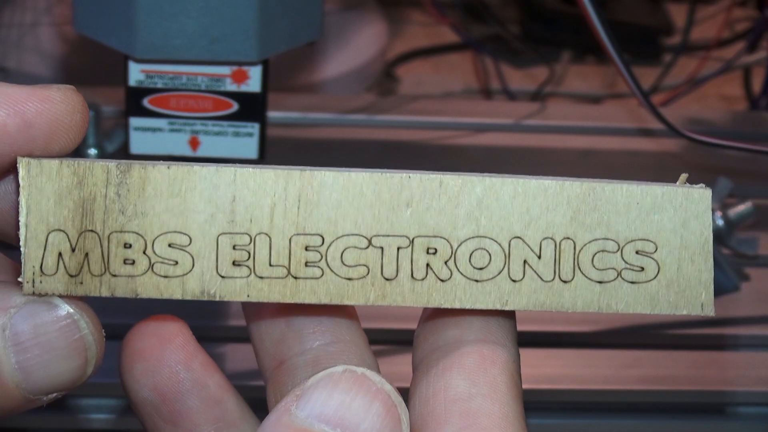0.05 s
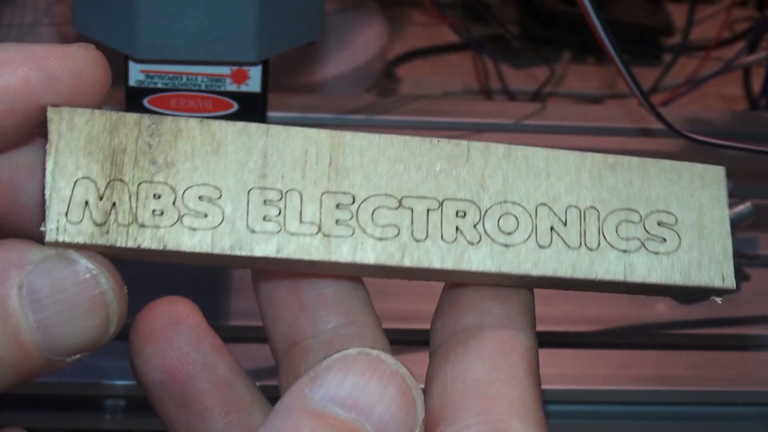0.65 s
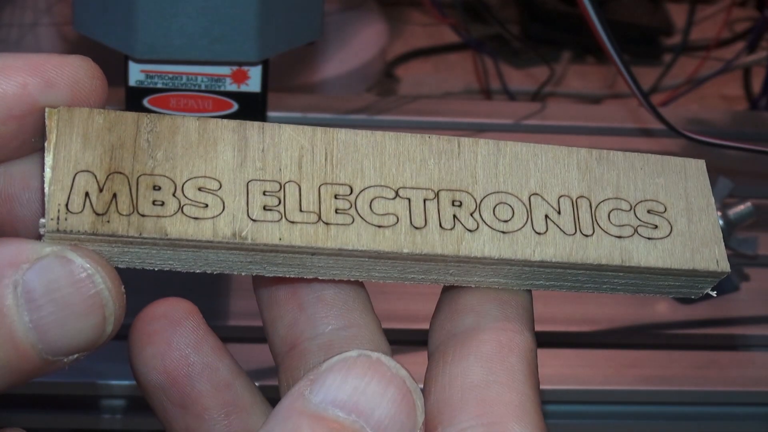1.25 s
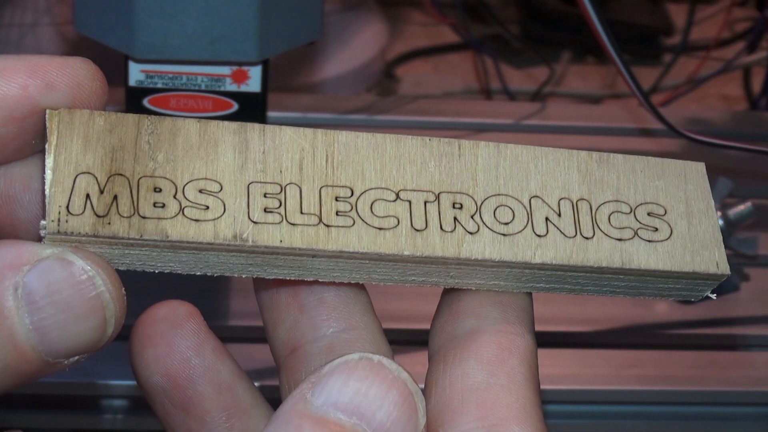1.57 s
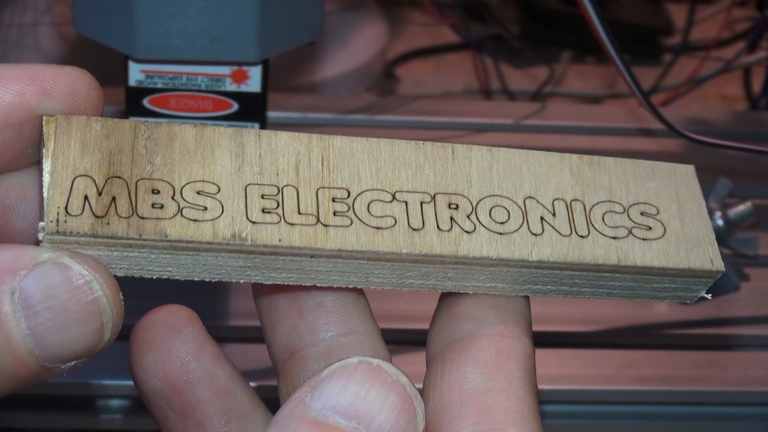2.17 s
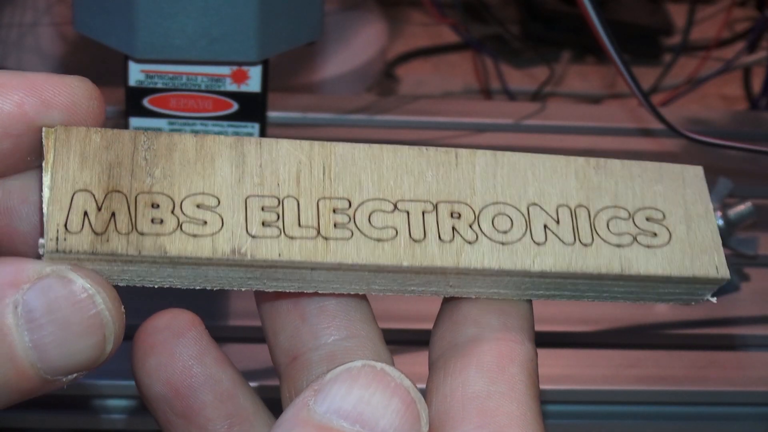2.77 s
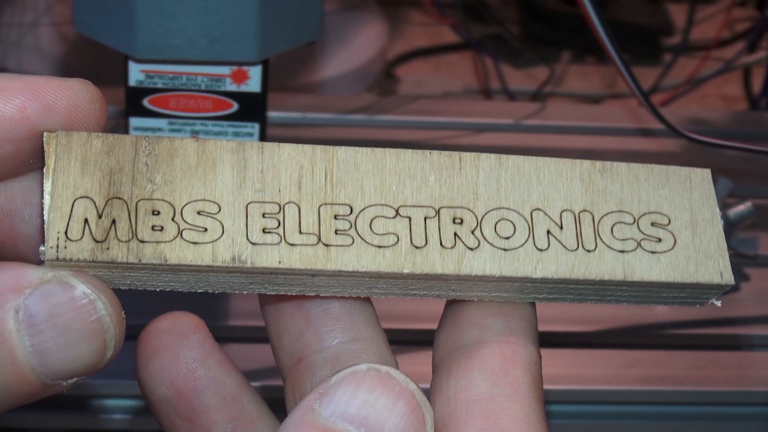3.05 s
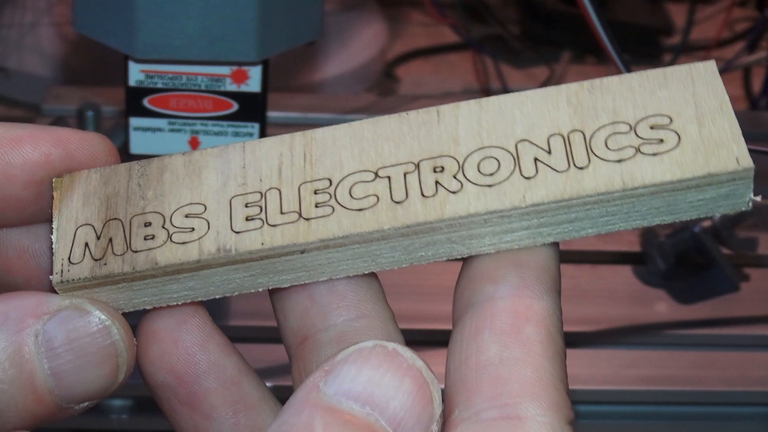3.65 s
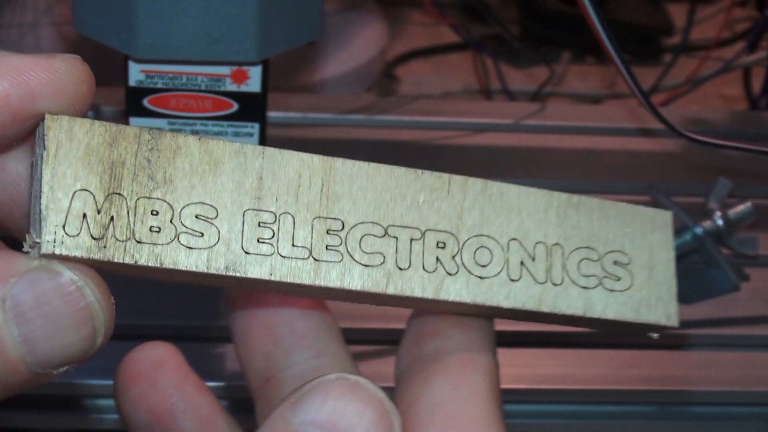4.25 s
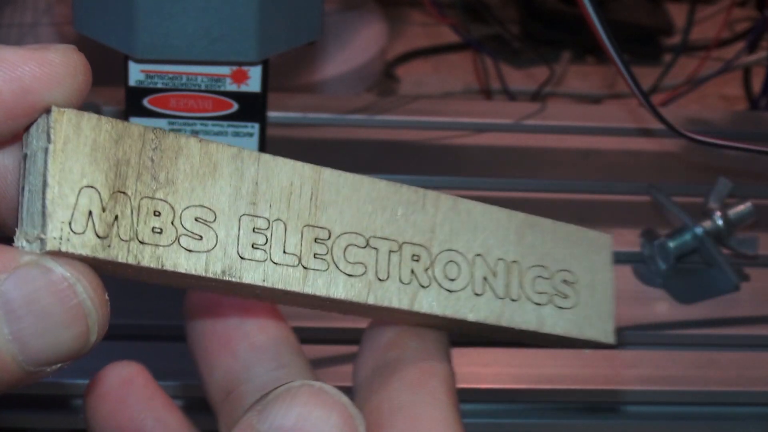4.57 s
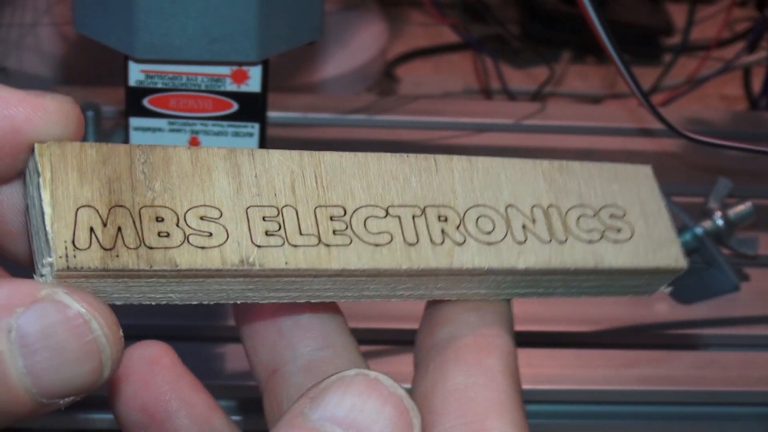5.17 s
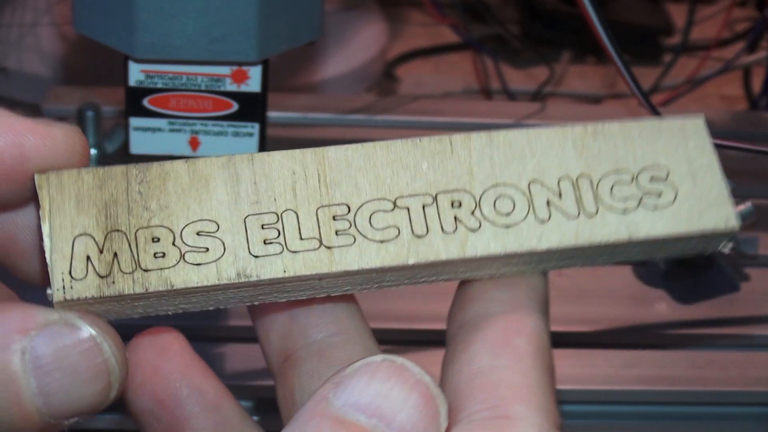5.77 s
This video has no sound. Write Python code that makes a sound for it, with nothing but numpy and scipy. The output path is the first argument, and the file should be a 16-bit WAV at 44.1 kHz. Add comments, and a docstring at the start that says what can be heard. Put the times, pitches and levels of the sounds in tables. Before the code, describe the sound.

The small cooling fan of an idling desktop laser engraver runs at full speed close to the microphone. Air hisses brightly through the machine, with a hoarse, high whistle that wavers slightly. Thin, steady whining tones from the fan sit within the hiss, over a very faint low hum. The sound stays even from start to finish.

```python
"""Idling laser engraver

A desktop laser engraver sits close by, its small cooling fan running at full speed.
Air hisses through the heat sink and whistles hoarsely near 2 kHz between the fins.
The blades and the fan motor add thin steady tones, over a faint low hum."""
import sys
import numpy as np
from scipy import signal
from scipy.fft import rfft, irfft
from scipy.io import wavfile

SR = 44100
rng = np.random.default_rng(int(sys.argv[2]) if len(sys.argv) > 2 else 0)


def waveform_to_disk(signal):
    """Save audio, clipped to [-1, 1], as 16-bit WAV at the path in sys.argv[1]."""
    frames = np.transpose(np.atleast_2d(signal))
    scaled = np.clip(frames, -1, 1) * 32767
    samples = np.round(scaled).astype(np.int16)
    wavfile.write(sys.argv[1], SR, samples)


N = 260631
T, HZ = np.arange(N) / SR, np.fft.rfftfreq(N, 1 / SR)

# The low hum. Each row: pitch in Hz, rms level in dB.
HUM_TONES = [(49, -72), (120, -61)]
# The fan's nearly steady pace. Each row: time in seconds, blade passing rate in Hz.
BLADE_RATE = [(0.6, 277.11), (1.8, 277.42), (3.0, 277.13), (4.2, 277.07), (5.5, 277.16)]
# Blade and motor tones. Each row: multiple of the blade rate, level in dB, left minus right in dB.
FAN_TONES = [(1, -53.5, -4), (2, -43.7, -6), (5, -39.5, -1.5), (10, -46.5, 3), (16, -35.6, -1.5)]
# The broad colour of the rushing air. Each row: frequency in Hz, noise density in dB.
AIR_COLOUR = [(12, -96.9), (25, -83.8), (100, -78.5), (250, -70.7), (600, -76.1), (1000, -67.3),
              (1600, -61.6), (2500, -64.8), (4500, -64.1), (7000, -62.6), (9500, -67.4), (12500, -65.9),
              (14500, -72.5), (15700, -79.7)]
# Peaks and dips that housing and frame put on the air. Each row: centre in Hz, width in Hz, gain in dB.
HOUSING_EQ = [(125, 27, 8.8), (154, 24, -3.6), (324, 18, 3.5), (454, 60, 3.9), (526, 113, 9.2),
              (778, 143, 8.6), (874, 50, 4.5), (1106, 27, -3.3), (1209, 133, 3.6), (1567, 17, -8.0),
              (2504, 58, -3.3), (3101, 144, 1.8), (3220, 47, -4.9), (3539, 234, 6.6), (3842, 401, 3.4),
              (4816, 203, -2.3), (5209, 385, 4.8), (5469, 183, 2.9), (6580, 84, -2.4), (6939, 137, 2.4),
              (7029, 87, -2.8), (7428, 200, 3.3), (7746, 336, 5.9), (8354, 177, -1.9), (8664, 294, 3.9),
              (9827, 254, -2.9), (11930, 252, 3.2), (12297, 243, -3.0), (13349, 1034, -3.5),
              (14097, 185, 1.6)]
# A bright band of the hiss sinks, then rises once. Each row: time in seconds, gain in dB.
SHEEN_RIDE = [(2.9, -0.1), (3.2, -1.2), (4.0, -0.7), (4.4, 0.6), (5.0, 1.1), (5.9, -0.1)]
# Air resonating between the fins. Each row: centre in Hz, half width in Hz, relative level in dB.
FIN_RESONANCES = [(1637, 58, -61.7), (1738, 29, -57.3), (1836, 35, -51.7), (1923, 22, -51.4),
                  (1966, 26, -45.2), (2026, 22, -48.1), (2081, 21, -52.2), (2163, 26, -58.2),
                  (2245, 31, -58.8), (2281, 9, -55.7), (2356, 31, -62.5)]
# How centred the air sounds. Each row: frequency in Hz, likeness of the channels from 0 to 1.
STEREO_LIKENESS = [(60, 0.97), (170, 0.86), (350, 0.9), (520, .96), (640, 0.96), (850, 0.985), (5300, 1),
                   (6200, 0.965), (10000, .94), (13500, 1)]
# Where the air sits. Each row: frequency in Hz, left minus right in dB.
AIR_PAN = [(60, 2), (150, 1), (280, 1), (450, -2.5), (560, -5.5), (720, 0.8), (1450, 0), (1660, 2.7),
           (1950, 0), (2100, 2.2), (3250, 1), (3600, 3), (4400, 0), (7000, 0.5), (14000, 0)]
# The treble reaches the left side slightly early. Each row: frequency in Hz, phase lead in radians.
LEFT_LEAD = [(5400, 0), (6300, 0.17), (8000, 0.1), (10000, 0.1), (13000, 0)]


def gain_of(db):
    """Decibels to amplitude."""
    return 10 ** (np.asarray(db) / 20)


def unit_rms(x):
    """The same signal at rms 1."""
    return x / np.sqrt(np.mean(x ** 2) + 1e-20)


def over_time(rows):
    """An automation curve, drawn through every sample."""
    return np.interp(T, *np.transpose(rows))


def over_hz(rows):
    """A curve across the spectrum, joined on a log axis."""
    hz, value = np.transpose(rows)
    return np.interp(np.log(HZ + 1), np.log(hz + 1), value)


def bell(centre_hz, width_hz):
    """An EQ bell of height 1, half as high at the ends of its width."""
    return .5 ** ((2 * (HZ - centre_hz) / width_hz) ** 2)


def wander(rate_hz):
    """Smooth random modulation of rms 1."""
    white = rfft(rng.standard_normal(N))
    return unit_rms(irfft(white * bell(0, 2 * rate_hz) * (HZ > 0), N))


def turbulence(density):
    """Swirling air in a narrow stereo image; density is its amplitude per root Hz."""
    mid, side = rfft(rng.standard_normal((2, N))) * np.sqrt(SR / 2)
    likeness = np.clip(over_hz(STEREO_LIKENESS), 0, 1)
    side = side * np.sqrt((1 - likeness) / (1 + likeness))
    pan = gain_of(over_hz(AIR_PAN) / 2) * np.exp(.5j * over_hz(LEFT_LEAD))
    left, right = (mid + side) * pan, (mid - side) / pan
    return irfft(np.array([left, right]) * density, N)


def hum(waver_db=1.5, waver_hz=2):
    """A faint bed of gently wavering low tones, dead centre."""
    out = np.zeros(N)
    for hz, db in HUM_TONES:
        tone = np.sqrt(2) * np.sin(2 * np.pi * (hz * T + rng.random()))
        out += tone * gain_of(db + waver_db * wander(waver_hz))
    return out


def fan_tones(waver_db=0.23, waver_hz=12, jitter_radians=0.15):
    """Thin tones locked to the rotor; uneven inflow shakes their level and phase."""
    blade_phase = 2 * np.pi * np.cumsum(over_time(BLADE_RATE)) / SR
    out = np.zeros((2, N))
    for multiple, db, pan_db in FAN_TONES:
        phase = multiple * blade_phase + jitter_radians * wander(waver_hz) + 2 * np.pi * rng.random()
        tone = np.sqrt(2) * np.sin(phase) * gain_of(db + waver_db * wander(waver_hz))
        pan = gain_of([[pan_db / 2], [-pan_db / 2]])
        out += tone * pan / pan.mean()
    return out


def air_hiss(trim_db=0.03, flutter_db=0.25, flutter_hz=30, sheen_hz=3560, sheen_width_hz=420):
    """Air rushes through the housing, which colours it; its strength flutters slightly."""
    housing_db = sum(db * bell(hz, width) for hz, width, db in HOUSING_EQ)
    air = turbulence(gain_of(over_hz(AIR_COLOUR) + housing_db))
    sheen = irfft(rfft(air) * bell(sheen_hz, sheen_width_hz), N)
    air += sheen * (gain_of(over_time(SHEEN_RIDE)) - 1)
    return air * gain_of(trim_db + flutter_db * wander(flutter_hz))


def fin_whistle(level_db=-25.1):
    """Eddies excite narrow resonances between the fins: a hoarse whistle that swells as they beat."""
    power = np.zeros_like(HZ)
    for hz, half_width, db in FIN_RESONANCES:
        detune = (HZ - hz) / half_width
        power += (gain_of(db) / (1 + detune ** 2)) ** 2
    return unit_rms(turbulence(np.sqrt(power))) * gain_of(level_db)


def scene():
    """Hum and fan tones underneath, hiss and whistle in front, all running throughout."""
    return hum() + fan_tones() + air_hiss() + fin_whistle()


def record(dry, cutoff_hz=15760):
    """A steep low-pass takes the very top off the mix."""
    taps = signal.firwin(1023, cutoff_hz, window=("kaiser", 9), fs=SR)
    return signal.oaconvolve(dry, taps[None], "same")


dry = scene()
out = record(dry)
waveform_to_disk(out)
```